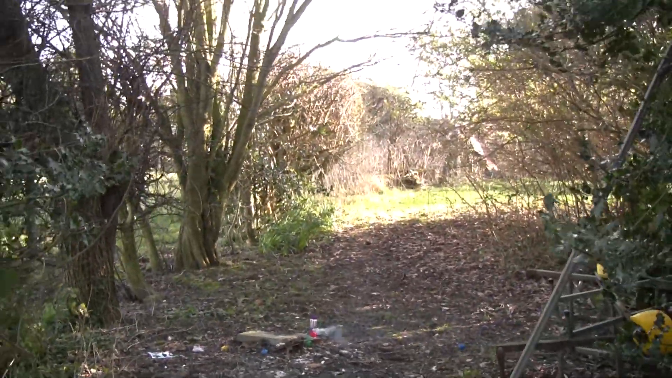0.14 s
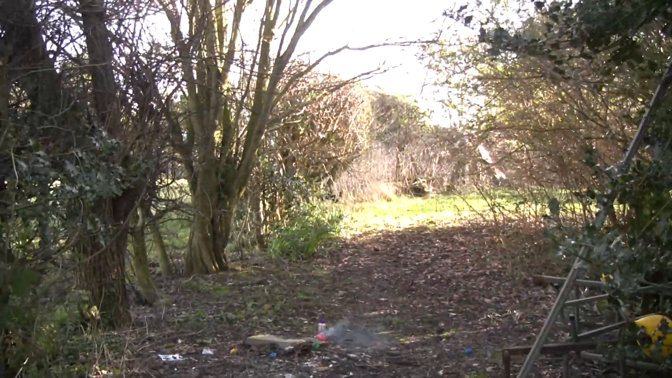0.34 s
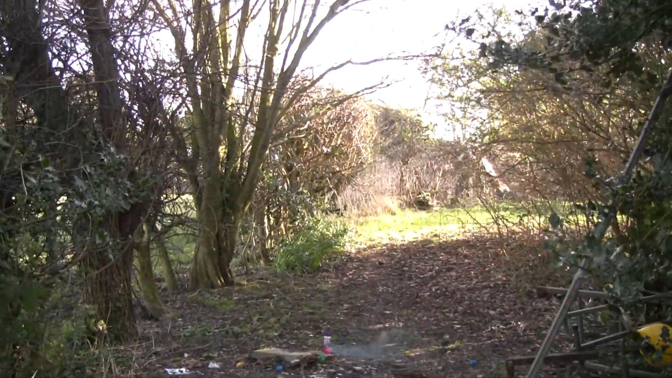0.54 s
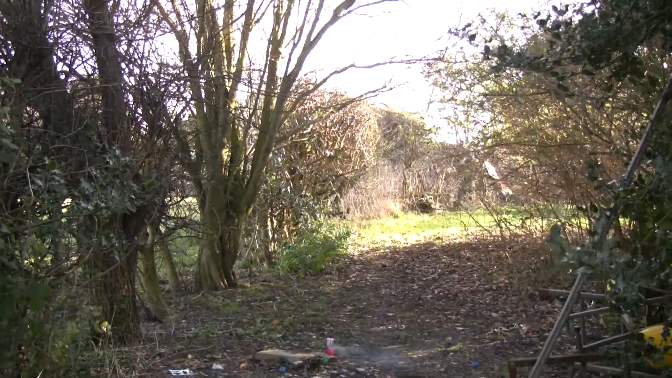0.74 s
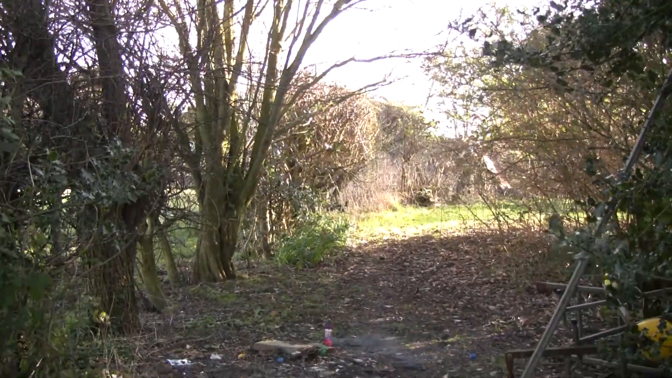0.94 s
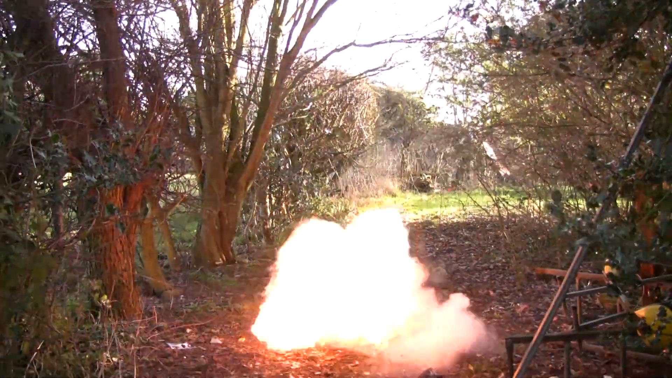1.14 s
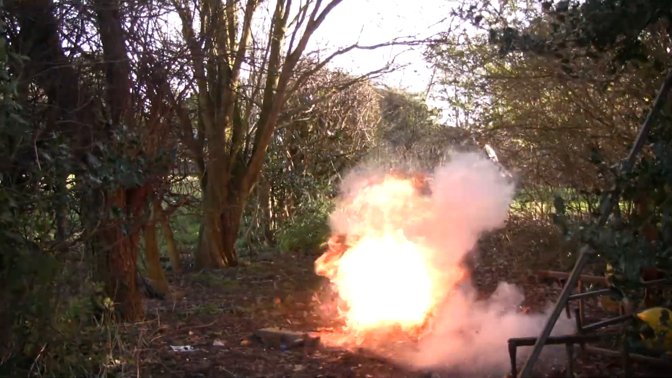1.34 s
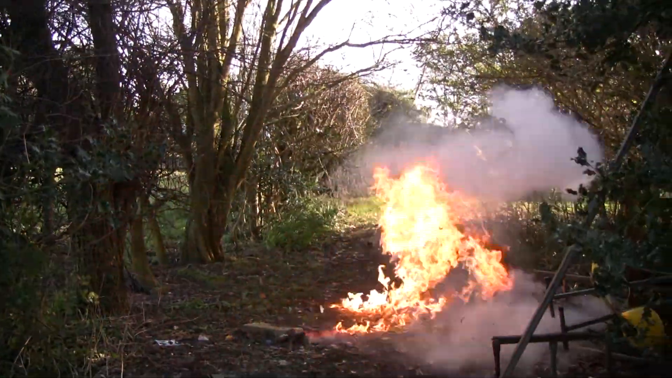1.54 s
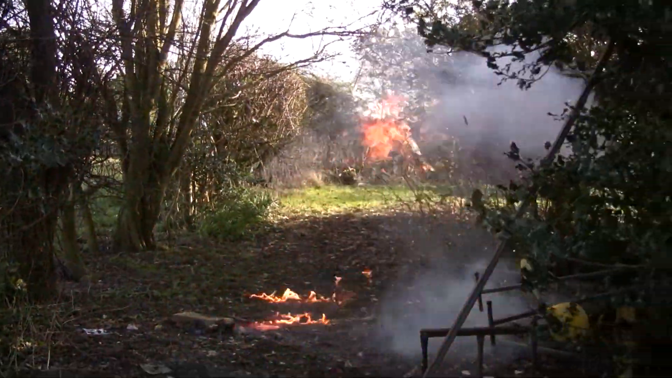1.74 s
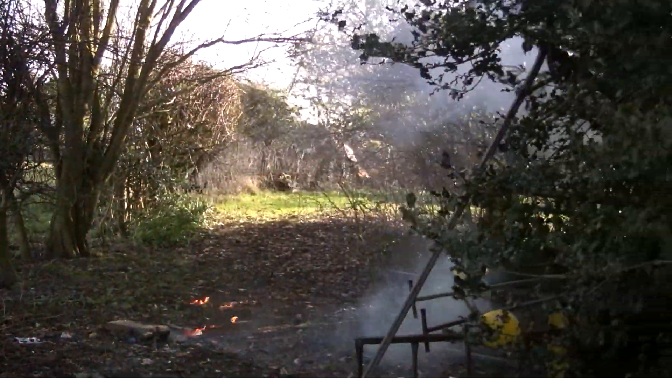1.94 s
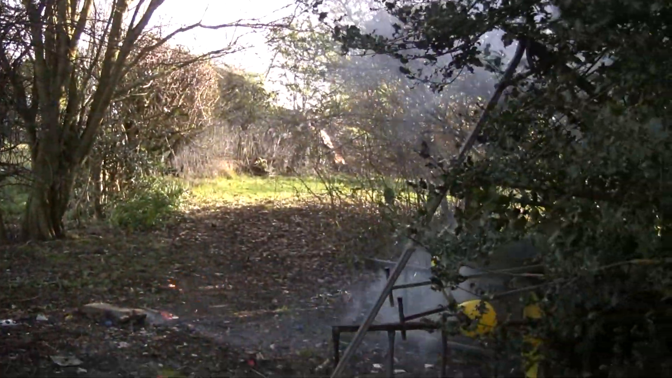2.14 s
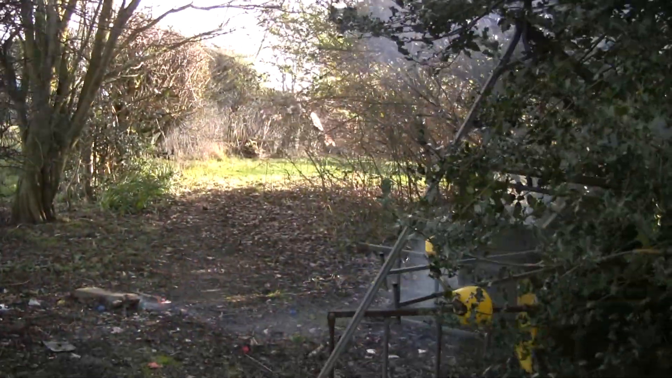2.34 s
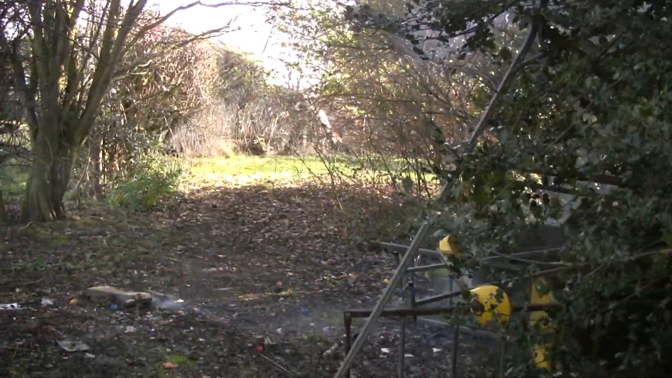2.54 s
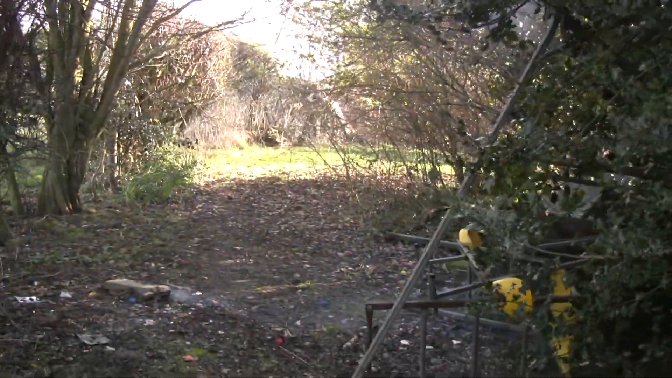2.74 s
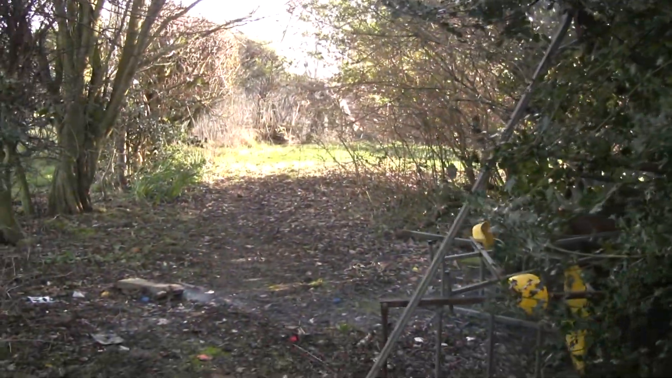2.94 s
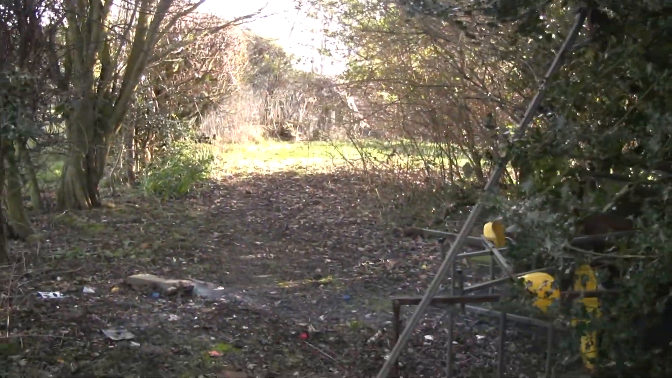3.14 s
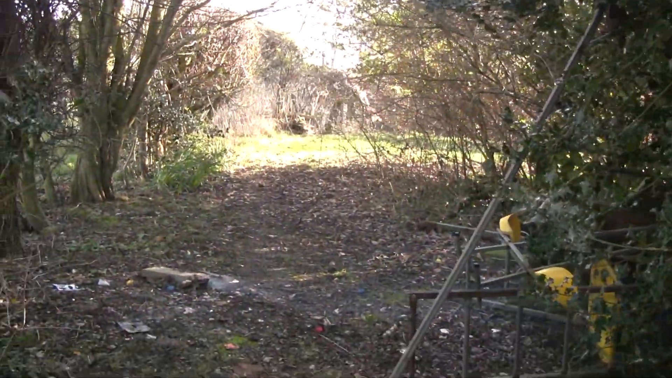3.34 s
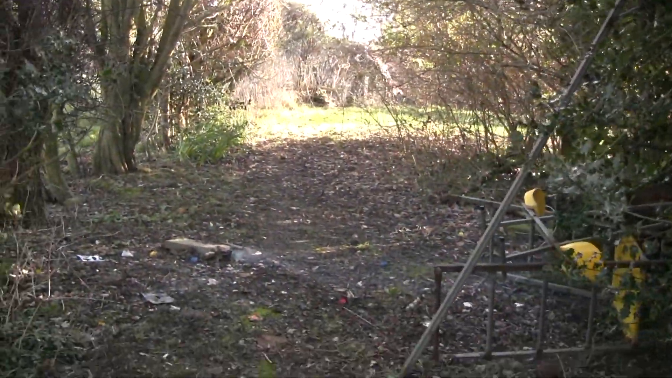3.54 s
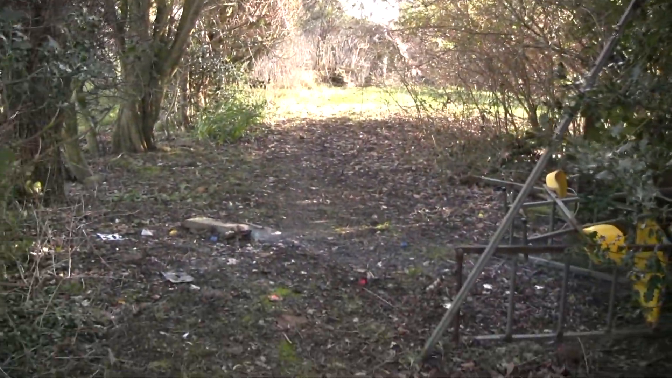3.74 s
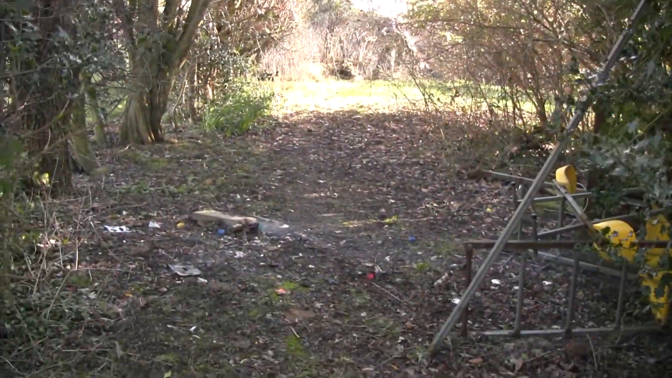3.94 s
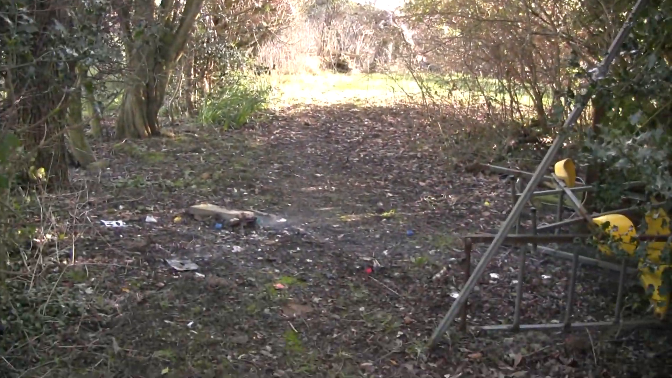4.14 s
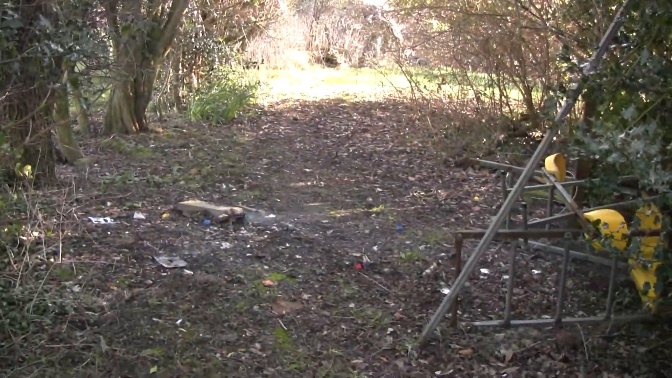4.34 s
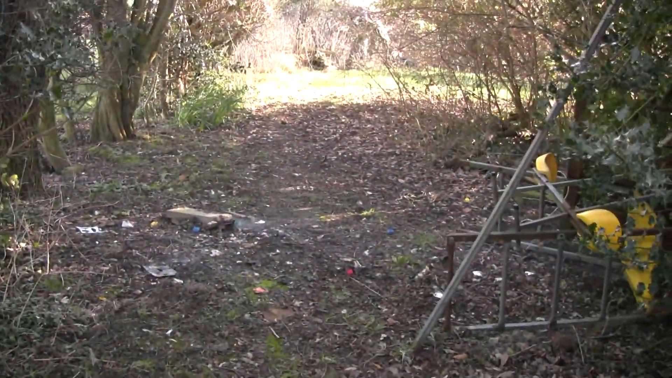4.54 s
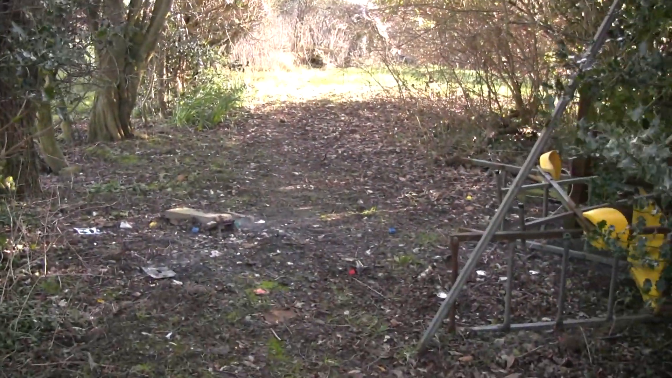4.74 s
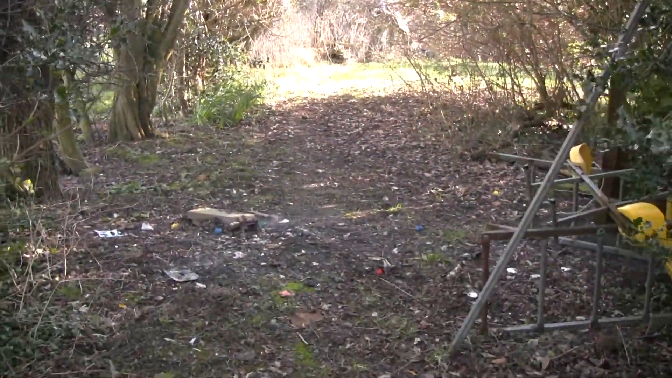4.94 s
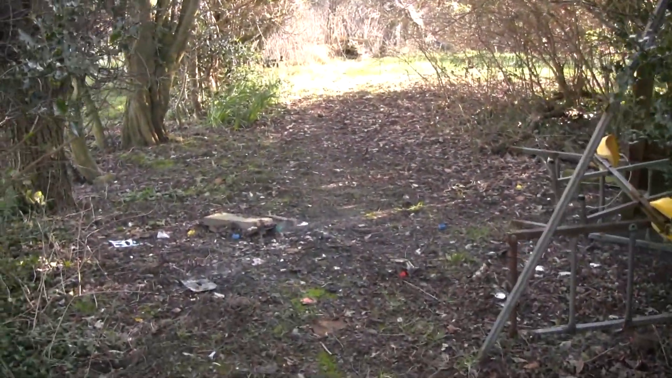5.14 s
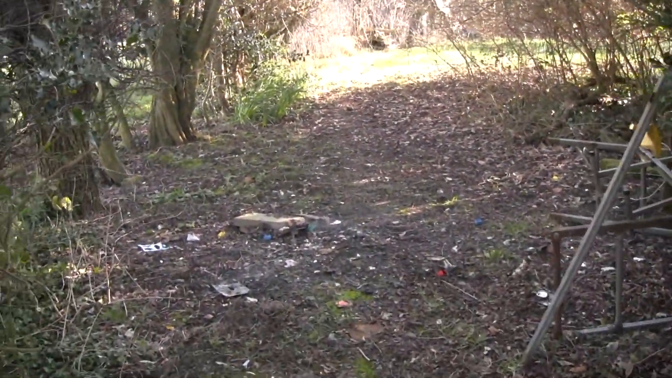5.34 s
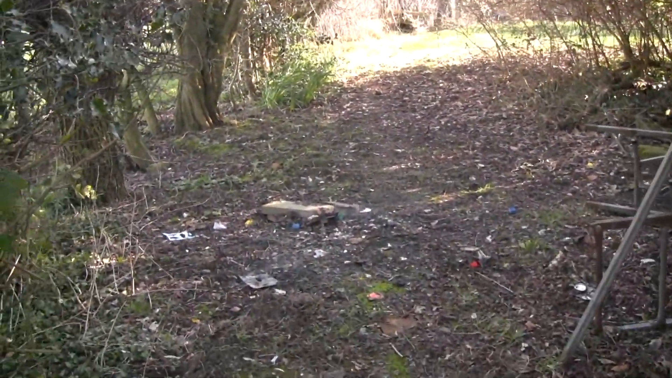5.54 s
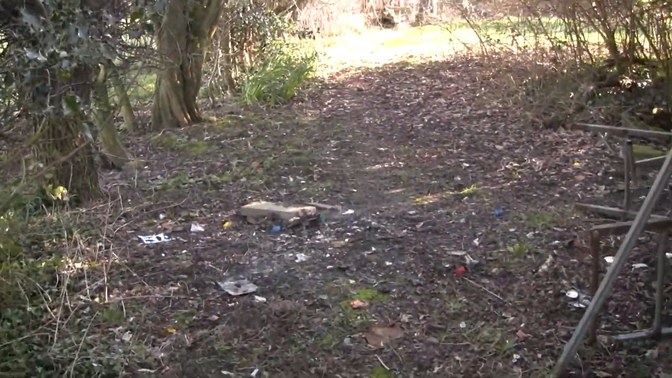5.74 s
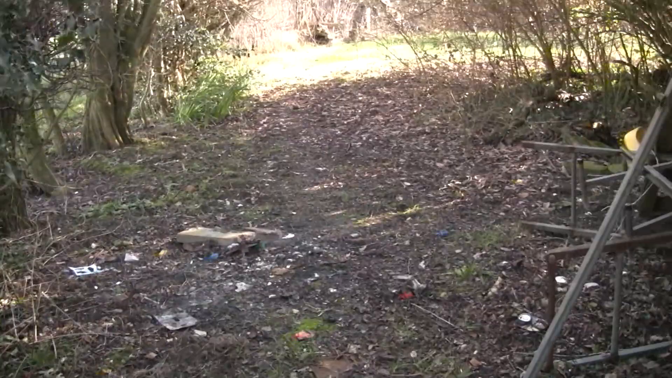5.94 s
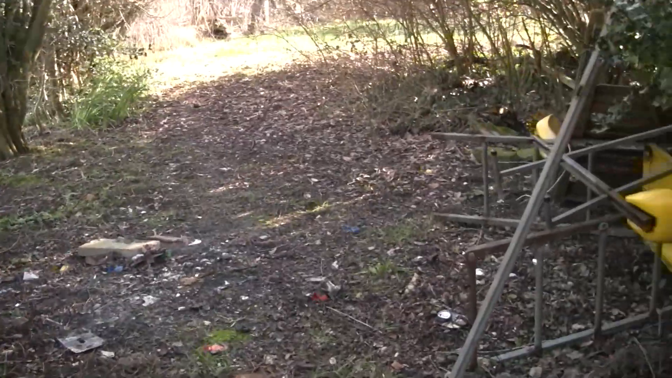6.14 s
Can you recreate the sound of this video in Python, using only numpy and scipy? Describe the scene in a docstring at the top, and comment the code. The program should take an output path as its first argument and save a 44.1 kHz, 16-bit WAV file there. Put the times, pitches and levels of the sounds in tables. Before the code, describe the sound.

A firecracker goes off with one sharp bang in woodland, echoing as debris patters onto dry leaves and rooks caw far away.

```python
"""Firecracker on a woodland floor

Close to a camcorder's stereo microphone, a fuse sputters and a firecracker bursts a small container,
overloading the preamplifier. The bang rolls back from trees and far hedges while fragments patter
down through leaves and twigs. Rooks caw in the distance, wind rumbles on the microphone and the motor
whines faintly. Near the end a twig snaps, and a footstep and camera handling add low thumps."""
import sys
import numpy as np
from scipy import signal
from scipy.fft import rfft, irfft, next_fast_len
from scipy.io import wavfile
from scipy.ndimage import uniform_filter1d, minimum_filter1d, map_coordinates

SR = 44100
rng = np.random.default_rng(int(sys.argv[2]) if len(sys.argv) > 2 else 0)


def wav_out(sig):
    """Save sig, one row per channel (or a flat mono array), as 16-bit PCM at SR to the path in sys.argv[1]."""
    wavfile.write(sys.argv[1], SR, np.round(np.clip(np.atleast_2d(sig).T, -1, 1) * 32767).astype(np.int16))


N = 276727
BANG_S = 1.0813

# spectrum of the bright edge of the returning bang: frequency_hz, density_db
EDGE_SPECTRUM = [(800, -2), (1300, -0.5), (2000, -1.5), (2800, -5.5), (3700, -3.5), (4500, -14.5),
                 (5500, -21), (7000, -26.5), (14000, -37)]
# spectrum of dry leaves: frequency_hz, density_db
LEAF_SPECTRUM = [(1500, 5), (2600, 1.5), (3700, 5.5), (5200, 0.5), (8000, 0), (12000, -3), (16000, -8.5)]


def amp(db):
    """Decibels to gain."""
    return 10 ** (np.asarray(db) / 20)


def unit(x):
    """x at rms 1."""
    return x / np.sqrt(np.mean(x ** 2) + 1e-20)


def along(points, hz):
    """Interpolate (frequency_hz, value) points on a log frequency axis."""
    f, v = np.transpose(points)
    return np.interp(np.log(hz + 1), np.log(f + 1), v)


def clock():
    """The time of every sample, in seconds."""
    return np.arange(N) / SR


def curve(points):
    """Interpolate (time_s, value) points at every sample."""
    return np.interp(clock(), *np.transpose(points))


def fade(t, t60):
    """A decay that loses 60 dB in t60 and is silent before t = 0."""
    return (t >= 0) * np.exp(-np.log(1000) * np.maximum(t, 0) / t60)


def swell(full_s, rise_s, hold_s, t60_s):
    """An envelope that swells until full_s, holds and dies away."""
    t = clock() - full_s
    return np.exp(-(np.minimum(t, 0) / rise_s) ** 2) * fade(np.maximum(t - hold_s, 0), t60_s)


def puffs(rows):
    """The joint envelope of bell-shaped puffs: centre_s, half_length_s, level_db."""
    return sum(amp(db) * np.exp(-((clock() - s) / half) ** 2) for s, half, db in rows)


def wobble(rate):
    """A smooth random curve, rate knots a second."""
    return map_coordinates(rng.standard_normal(int(N * rate / SR) + 4), [clock() * rate])


def filtered(x, response):
    """x filtered by a response given as a function of frequency."""
    m = next_fast_len(x.shape[-1] + SR // 4)
    return irfft(rfft(x, m) * response(np.fft.rfftfreq(m, 1 / SR)), m)[..., :x.shape[-1]]


def noise(spectrum, grain_db=0, grain_rate=400):
    """Coloured noise of rms 1; grain_db clumps it into grains."""
    white = rng.standard_normal(N) * amp(grain_db * np.clip(wobble(grain_rate), -2, 2))
    return unit(filtered(white, lambda hz: amp(along(spectrum, hz))))


def resonance(f, hz, width):
    """The response of one damped mode."""
    return 1j * f * width / (hz * hz - f * f + 1j * f * width)


def pressure_wave(t, hz):
    """One rounded push and pull, centred on t = 0."""
    u = 2 * np.pi * hz * t
    return -u * np.exp((1 - u * u) / 2)


def add(track, s, sound):
    """Mix a sound into the track at time s."""
    part = track[round(s * SR):][:len(sound)]
    part += sound[:len(part)]


def motor():
    """The camcorder's motor whines in thin, slightly wavering tones."""
    # motor tones: pitch_hz, level_db
    tones = [(3499, -69), (3898, -62.5), (4194, -65), (4495, -74), (4797, -71), (5394, -73), (5696, -72.5),
             (5992, -76), (6697, -79)]
    return sum(amp(db) * np.sqrt(2) * np.sin(2 * np.pi * hz * clock() + .4 * wobble(2.4))
               for hz, db in tones)


def distant_wash():
    """A nearly steady wash of noise from far off."""
    # colour of the wash: frequency_hz, density_db
    spectrum = [(150, 7.5), (300, 3.5), (600, 2), (1000, 2), (1500, -4), (2200, -13.5), (3000, -15.5),
                (3700, -12.5), (5000, -22), (8000, -28.5), (15500, -35)]
    # its slow drift: time_s, level_db
    levels = [(0, -40), (1.1, -42), (3.3, -38), (4.4, -39.5), (6.27, -39)]
    return amp(curve(levels)) * noise(spectrum)


def wind_and_thumps():
    """Wind buffets the microphone; a footstep and camera handling add low thumps."""
    # strength of the gusts: time_s, relative_level_db
    gusts = [(0, -32), (.35, -27), (1.1, -28), (1.3, -31.5), (1.7, -36.5), (2.0, -33), (2.15, -24),
             (2.95, -27), (3.5, -30.5), (3.9, -28), (4.35, -29), (5.0, -27.5), (5.25, -39.5), (5.65, -31.5),
             (5.85, -28), (6.02, -39.5), (6.27, -44.5)]
    # colour of the buffeting: frequency_hz, density_db
    rumble = [(12, -2.5), (20, 0.5), (38, -2), (60, 0), (100, -3), (150, -12), (220, -20), (400, -34.5),
              (900, -103)]
    # footstep and handling thumps: centre_s, peak_db, centre_hz
    thumps = [(3.974, -20, 50), (5.755, -21, 60), (5.777, -15, 145), (5.793, -15, 55), (5.8285, -12, 62),
              (5.926, -20, 70)]
    mid = amp(curve(gusts) + 1.4) * noise(rumble, grain_db=2.5, grain_rate=9.3)
    mid += sum(amp(db) * pressure_wave(clock() - s, hz) for s, db, hz in thumps)
    port_difference = [(20, -8.5), (50, -8.5), (120, -15), (300, -21)]  # frequency_hz, gain_db
    side = filtered(mid, lambda hz: amp(along(port_difference, hz)) * np.exp(1.95j))
    return np.array([mid + side, mid - side])


def woodland(x):
    """Diffuse reverberation among the trees; the treble dies first."""
    # decay of the wood: frequency_hz, t60_s
    decay = [(200, 3.9), (1500, 0.21), (4000, 0.37), (12000, 0.064)]
    hz, t, bands = signal.stft(rng.standard_normal(SR), SR, nperseg=256)
    tail = signal.istft(bands * fade(t, along(decay, hz)[:, None]), SR, nperseg=256)[1]
    return signal.fftconvolve(x, tail / np.linalg.norm(tail))[:N]


def rooks():
    """Distant rooks: hoarse, uneven pulses on an arching pitch ring the throat."""
    # caws: start_s, length_s, relative_level_db, throat_hz
    caws = [(3.139, 0.34, -39, 1370), (3.487, .27, -41, 1360), (3.812, 0.28, -37.5, 1400),
            (4.111, .14, -41.5, 1420), (4.48, 0.25, -40, 1370), (4.683, 0.25, -42, 1370),
            (5.264, .23, -34, 1405), (5.631, .41, -41.5, 1320), (6.187, .2, -38, 1310)]
    # resonances of a rook's throat: multiple_of_throat_hz, width_hz, gain_db
    formants = [(1, 260, 0), (1.25, 340, -4), (2.62, 300, -15)]
    base_pitch_hz = 357.6
    out = np.zeros(N)
    rasp, breath, jitter = wobble(130), rng.standard_normal(N), .08 * wobble(260)
    for s, length, db, throat_hz in caws:
        span = np.minimum(round(s * SR) + np.arange(int(length * SR)), N - 1)
        effort = np.abs(np.sin(np.linspace(0, np.pi, len(span))))
        cycles = np.cumsum(base_pitch_hz * (.94 + .08 * effort + jitter[span])) / SR
        pulses = unit(np.diff(np.floor(cycles), prepend=0))
        voice = (pulses + 0.74 * breath[span]) * amp(1.2 * rasp[span])
        throat = lambda f: sum(amp(gain_db) * np.abs(resonance(f, k * throat_hz, width)) ** 2
                               for k, width, gain_db in formants)
        add(out, s, amp(db) * np.sqrt(effort) * unit(filtered(voice, throat)))
    return out


def shower():
    """How heavily the thrown-up grit is falling."""
    return amp(-47.5) * swell(full_s=1.9, rise_s=0.17, hold_s=1.19, t60_s=6.3)


def litter():
    """Single grains of grit tick on the dry leaves over a finer rustle; now and then the leaves stir."""
    # leaves stirring softly: centre_s, half_length_s, level_db
    stirs = [(3, .07, -58), (3.96, 0.03, -48), (4.5, 0.046, -47.5), (5.885, 0.072, -48)]
    grains_per_s, rest_db = 160, -70
    hits = (rng.random(N) < grains_per_s / SR) * amp(10 * np.minimum(rng.exponential(1, N), 2))
    crunch = fade(np.arange(SR // 100) / SR, t60=0.0035)
    grit = signal.fftconvolve(hits, crunch)[:N] * rng.standard_normal(N)
    grit = unit(filtered(grit, lambda hz: amp(along(LEAF_SPECTRUM, hz))))
    flurries = (shower() + amp(rest_db)) * amp(0.43 * np.clip(wobble(18), -2, 1.5))
    patter = flurries * (amp(-1.5) * grit + amp(-2) * noise(LEAF_SPECTRUM))
    return patter + puffs(stirs) * noise(LEAF_SPECTRUM, grain_db=4)


def tick_and_rustle(hz, t60, tick_gain, rustle_gain, leaves):
    """A landing piece or a snapping twig ticks and shakes dry leaves, which always settle alike."""
    rustle_rise_s, rustle_t60_s = 0.00067, 0.11
    t = np.arange(len(leaves)) / SR
    contact = rng.standard_normal(len(t)) * fade(t, t60)
    width_hz = 600 + 16 / t60  # brief contacts click, longer ones ring
    tick = filtered(contact, lambda f: resonance(f, hz, width_hz) ** 2)
    rustle = leaves * fade(t, rustle_t60_s) * (1 - np.exp(-t / rustle_rise_s))
    return amp(3.5) * tick_gain * tick / np.abs(tick).max() + rustle_gain * rustle


def fragments_and_twig():
    """Larger pieces land one by one, with crumbs at random between them; near the end a twig snaps."""
    # pieces landing, then in the last two rows the twig's snap and its reverberant tail:
    # start_s, relative_tick_db, pitch_hz, ring_t60_s, rustle_db
    ticks = [(1.31, -29, 7040, .027, -26.5), (1.439, -35, 9000, .008, -35),
             (1.5643, -28, 12000, .07, -32.5), (1.697, -52, 6850, .01, -34), (1.882, -29, 3980, 0.023, -33),
             (1.9586, -29.5, 4310, 0.07, -35), (2.037, -22, 11000, .0023, -39),
             (2.191, -30, 3740, 0.018, -29), (2.202, -22.5, 3500, .028, -39),
             (2.2692, -14, 3910, 0.058, -31), (2.344, -31, 3960, .022, -46),
             (2.491, -28.5, 3650, .016, -40), (2.432, -40, 3500, 0.035, -28),
             (2.566, -32, 10400, 0.0031, -30.5), (2.7044, -44, 3660, 0.027, -31.5),
             (2.8475, -24, 4000, .06, -47), (2.8702, -20, 3650, 0.039, -24.5),
             (2.885, -25, 4250, 0.019, -48), (2.952, -34, 4130, .017, -36), (2.975, -25, 9400, .0053, -55),
             (3.045, -27.5, 5000, 0.0068, -60), (3.117, -22, 4140, 0.009, -37),
             (3.131, -22.5, 3640, 0.017, -51), (3.3, -21.5, 8700, 0.00078, -44),
             (3.52, -27.5, 4020, 0.0029, -40), (3.645, -54, 9000, 0.017, -33.5),
             (3.8, -24, 7170, 0.023, -37.5), (3.9796, -32, 3680, 0.019, -51),
             (4.1786, -25, 4000, 0.0059, -42), (4.5206, -31.5, 3830, .0093, -53),
             (4.772, -48, 8000, .015, -48), (5.627, -38, 6200, 0.0089, -54),
             (5.7177, -24.5, 3050, 0.014, -64), (5.725, -35, 3700, .1, -57)]
    crumbs_per_s, lowest_crumb_hz = 9, 3800
    out = np.zeros(N)
    leaves = noise(LEAF_SPECTRUM, grain_db=-2.5, grain_rate=790)
    leaves_at = lambda s: leaves[round(s * SR):][:SR // 5]
    for s, db, hz, t60, rustle_db in ticks:
        add(out, s, tick_and_rustle(hz, t60, amp(db), amp(rustle_db), leaves_at(s)))
    crumb_gain = amp(14) * shower()
    for when, pitch in rng.random((int(crumbs_per_s * N / SR), 2)):
        s = BANG_S + when * (N / SR - BANG_S - .5)
        hz = lowest_crumb_hz * 2 ** (1.3 * pitch ** 3)
        gain = crumb_gain[round(s * SR)]
        add(out, s, tick_and_rustle(hz, 0.02, gain, amp(-10) * gain, leaves_at(s)))
    return out


def roll():
    """Stands of trees return the bang; longer paths swell more slowly, last longer and sound duller."""
    # returns from the stands: full_s, hold_s, boom_db, body_db, edge_db
    returns = [(1.252, 0.17, -15.5, -23, -21.5), (2.124, 0.085, -19.5, -34, -35),
               (2.56, 0.16, -29.5, -28.5, -40)]
    # spectrum of the distant boom: frequency_hz, density_db
    far_boom = [(60, -21), (105, 3), (160, 6.5), (240, 0), (350, -12.5), (600, -71), (2000, -87)]
    # spectrum of the roll's midrange body: frequency_hz, density_db
    body_spectrum = [(200, -1), (380, 5.5), (600, 0.5), (1100, -3.5), (1700, -13.5), (4000, -86)]
    t = clock()
    power = np.zeros((3, N))
    for s, hold_s, boom_db, body_db, edge_db in returns:
        delay_s = s - BANG_S
        rise_s, t60_s = 0.43 * delay_s, 1.93 + 0.7 * delay_s
        deep = swell(s, rise_s, hold_s, 1.19 * t60_s)  # the boom lingers
        bright = swell(s, rise_s, hold_s, t60_s)
        power += np.array([amp(boom_db) * deep, amp(body_db) * bright, amp(edge_db) * bright]) ** 2
    far_share = np.clip((t - BANG_S) / 0.77, 0, 1)
    recede = lambda near, far: np.sqrt(1 - far_share) * near + np.sqrt(far_share) * far
    near_boom = [(1.39 * hz, db) for hz, db in far_boom]
    far_edge = [(hz, db - hz / 450) for hz, db in EDGE_SPECTRUM]  # air absorbs the treble most
    boom = recede(noise(near_boom, grain_db=1, grain_rate=80),
                  noise(far_boom, grain_db=2, grain_rate=62))
    body = noise(body_spectrum, grain_db=1.5, grain_rate=250)
    edge = recede(noise(EDGE_SPECTRUM, grain_db=1, grain_rate=600), noise(far_edge, grain_db=2))
    return (t > BANG_S) * (np.sqrt(power) * [boom, body, edge]).sum(0)


def echoes():
    """Each large surface returns one pressure wave, smeared by nearby trunks, and some bright scatter."""
    # single echoes: arrival_s, peak_db, centre_hz, relative_scatter_db
    reflections = [(1.263, -11, 900, -5), (1.2681, -1.5, 283, -22), (1.39, -6.5, 172, -32),
                   (1.4712, -7.5, 1070, -11), (1.5906, -14.5, 490, -6), (1.6113, -0.5, 230, -25),
                   (1.875, -11.5, 245, -21), (2.125, -3.5, 159, -31), (2.699, -14, 500, -30)]
    smear_db, smear_s = -14.5, 0.026
    scatter_rise_s, scatter_t60_s = 0.0019, 0.028
    out = np.zeros(N)
    t = np.arange(-SR // 10, SR // 10) / SR
    spray = noise([(hz, db - hz / 900) for hz, db in EDGE_SPECTRUM])  # dulled by the air
    burst = np.exp(-(np.minimum(t, 0) / scatter_rise_s) ** 2) * fade(np.maximum(t, 0), scatter_t60_s)
    for s, db, hz, scatter_db in reflections:
        wave = pressure_wave(t, hz)
        smear = unit(signal.fftconvolve(rng.standard_normal(len(t)), wave, "same"))
        smear *= np.exp(-(t / smear_s) ** 2)
        scatter = amp(scatter_db) * burst * spray[round(s * SR):][:len(t)]
        add(out, s + t[0], amp(db) * (wave + amp(smear_db) * smear + scatter))
    return out


def fuse():
    """The fuse smoulders, spurts and spits until the charge fires."""
    # colour of its fizz: frequency_hz, density_db
    fizz = [(1470, -12), (2500, -8), (3630, -6.5), (4950, -14.5), (6910, -9), (12300, -12), (16000, -15.5)]
    # spurts of burning: centre_s, half_length_s, level_db
    spurts = [(.43, 0.038, -41.5), (.47, 0.11, -50.5), (.815, .03, -54.5), (.925, .04, -57)]
    # sparks spat out: start_s, level_db
    spits = [(0.386, -35), (.785, -47), (.824, -38.5)]
    smoulder = amp(-63)
    sparks = sum(amp(db) * fade(clock() - s, t60=0.01) for s, db in spits)
    return (smoulder + puffs(spurts) + sparks) * noise(fizz, grain_db=3.2) * (clock() < BANG_S)


def blast():
    """A heavy push of air, and dense scatter off the undergrowth, slightly different at each capsule."""
    # spectrum of the crack at the microphone: frequency_hz, density_db
    crack = [(60, -2.5), (150, -1.5), (350, 5.5), (700, -3.5), (1100, -5.5), (2200, -8.5), (3600, -5.5),
             (5000, -14), (9000, -19.5), (15000, -28.5)]
    push_spectrum = [(30, -9), (100, -0.5), (330, 3.5), (700, 5.5), (1100, -27), (3000, -50)]
    t = clock() - BANG_S
    push = amp(13.5) * fade(t, t60=0.11) * noise(push_spectrum)
    mid, side = noise(crack, grain_db=1.5), amp(-31) * noise(crack)
    return push + amp(14.5) * fade(t, t60=.22) * np.array([mid + side, mid - side])


def scene():
    """Everything reaches two closely spaced capsules almost alike."""
    ground = fragments_and_twig() + litter()
    birds = rooks()
    returning_bang = roll() + echoes()
    background = motor() + distant_wash()
    centre = fuse() + returning_bang + ground + amp(-3.5) * birds + background
    diffuse = woodland(amp(-15) * ground + amp(-5) * birds)
    side = amp(-48.5) * woodland(returning_bang + ground + background)
    return blast() + centre + diffuse + np.array([side, -side]) + wind_and_thumps()


def gain_control(x, threshold, duck_db, lag_s, hold_s):
    """Sustained overload turns the gain down a moment late, and it is held there briefly."""
    span = int(hold_s * SR)
    too_loud = np.abs(x).max(0) > threshold
    overload = uniform_filter1d(too_loud.astype(float), SR // 250)  # share of a 4 ms window
    gain = minimum_filter1d(amp(duck_db * overload ** 2), span, origin=(span - 1) // 2)
    return x * np.interp(clock() - lag_s, clock(), gain)


def record(dry):
    """The camcorder's preamplifier clips, its gain control ducks, and the top treble is cut off."""
    ceiling_db, top_hz = -.4, 16000
    clipped = amp(ceiling_db) * dry / (1 + np.abs(dry) ** 10) ** (1 / 10)
    ducked = gain_control(clipped, threshold=.8, duck_db=-8.5, lag_s=.0175, hold_s=0.073)
    return filtered(ducked, lambda hz: 1 / np.sqrt(1 + (hz / top_hz) ** 160))


dry = scene()
out = record(dry)
wav_out(out)
```